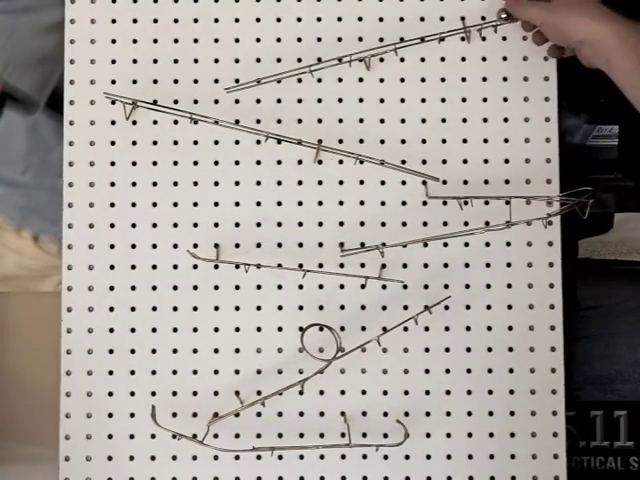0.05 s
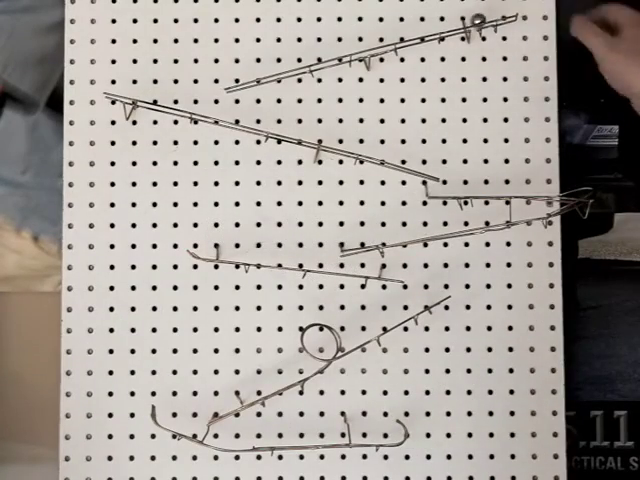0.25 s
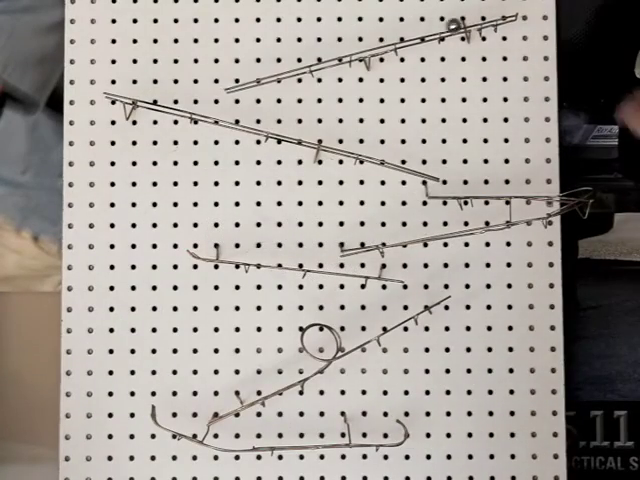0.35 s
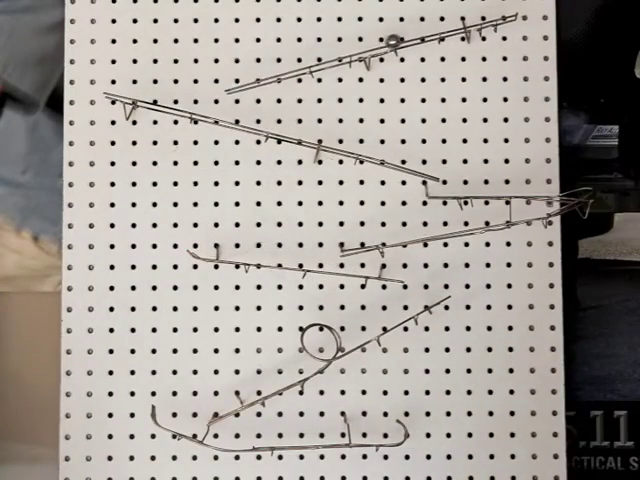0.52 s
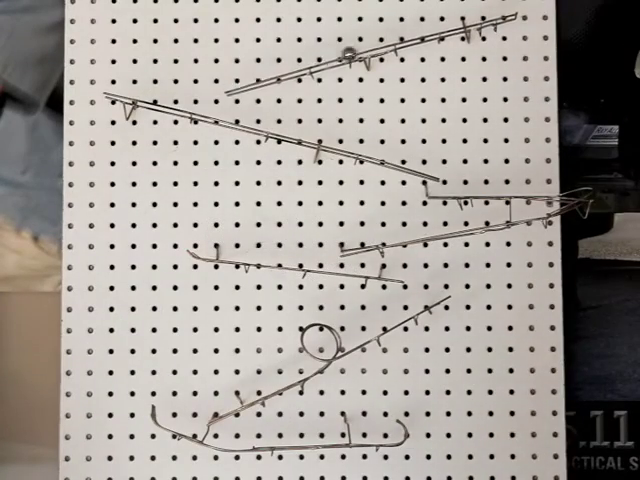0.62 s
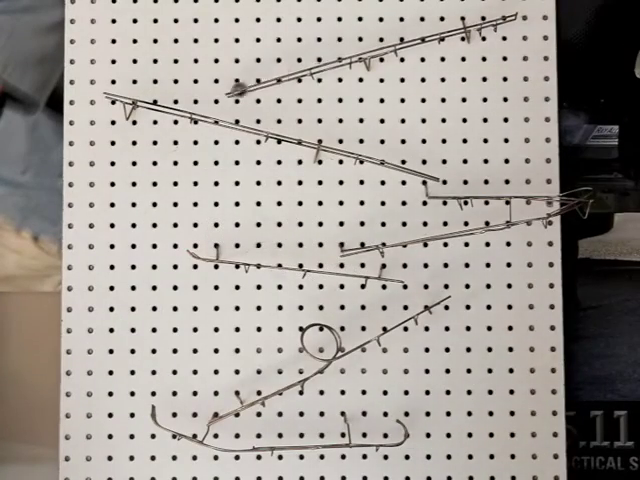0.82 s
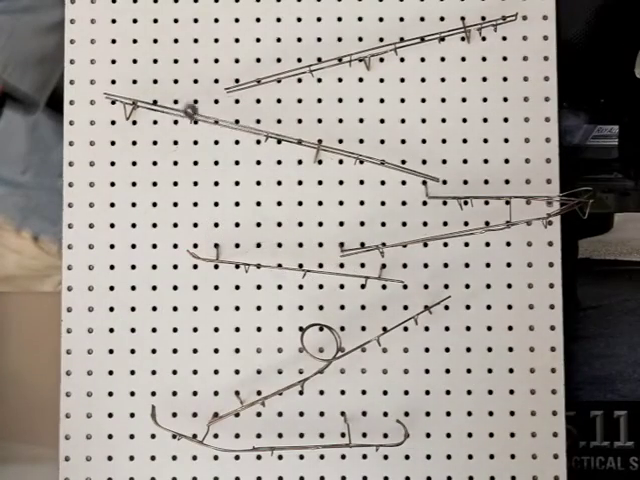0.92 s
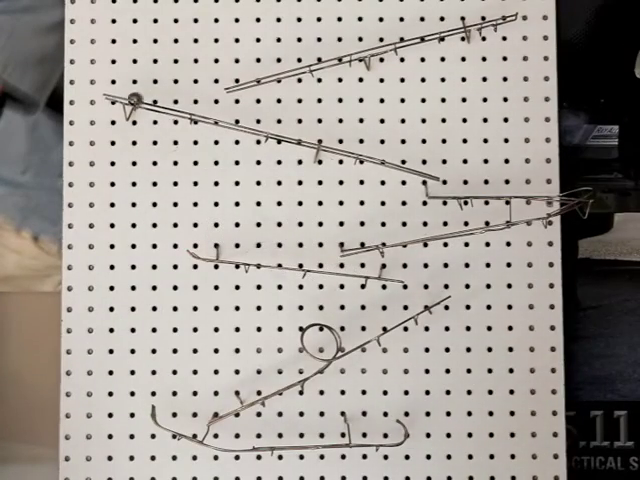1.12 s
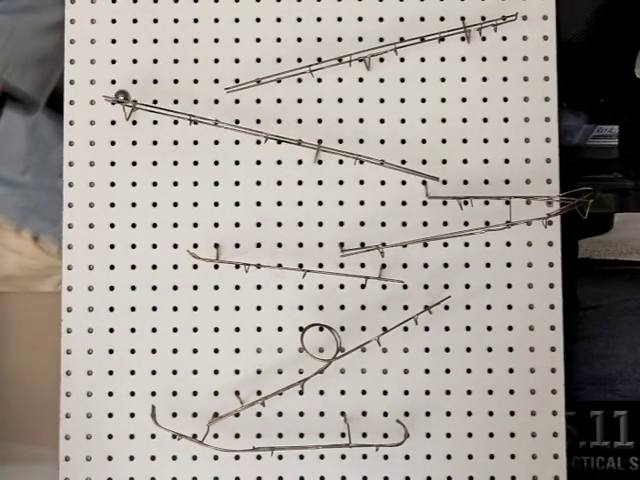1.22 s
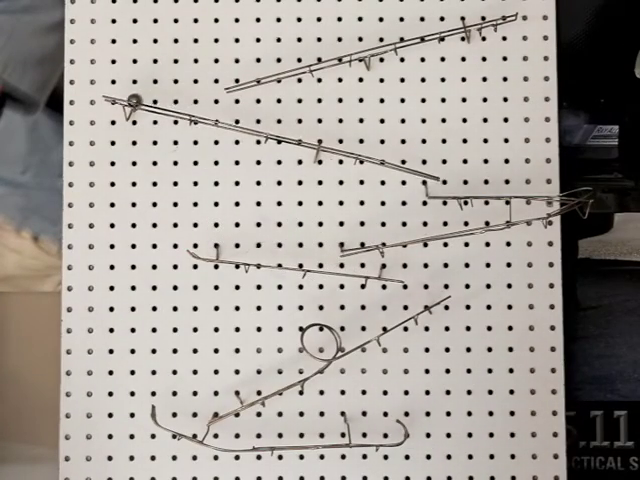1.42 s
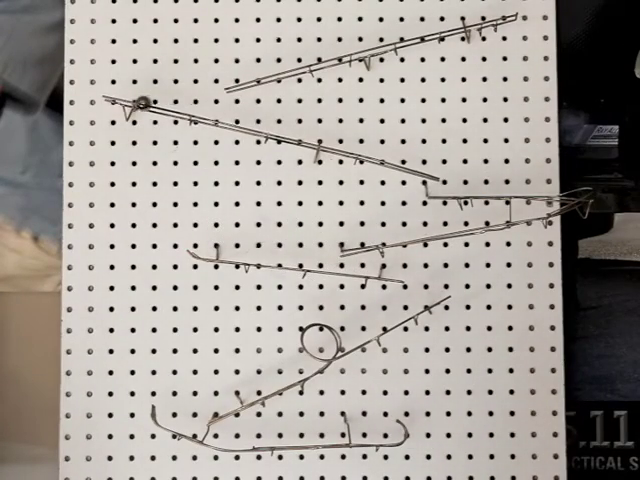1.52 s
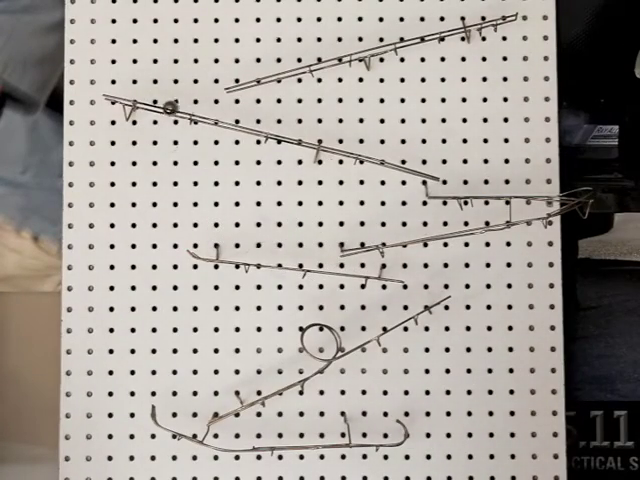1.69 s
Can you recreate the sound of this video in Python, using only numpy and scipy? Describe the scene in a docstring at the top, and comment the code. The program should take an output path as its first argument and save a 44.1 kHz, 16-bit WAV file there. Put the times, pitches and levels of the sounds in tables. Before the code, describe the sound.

A small steel ball rolls down thin wire rails with ringing ticks and a low rumble from the board behind. It drops onto a second track with a clack, rattles and taps faintly, in a small room.

```python
"""In a small room, a small steel ball rolls down a pair of thin wire rails pegged to a board.
It ticks and knocks, drops onto a second track with a clack, rattles against the raised end
and creeps back with a few faint taps. Contacts ring each track's own modes, the ball shakes
the board through the pegs, and the room blurs every contact."""
import sys
import numpy as np
from scipy import signal
from scipy.fft import rfft, irfft
from scipy.io import wavfile
from scipy.ndimage import uniform_filter1d

SR = 44100
rng = np.random.default_rng(int(sys.argv[2]) if len(sys.argv) > 2 else 0)


def file_out(sig):
    """Save sig as 16-bit WAV at sys.argv[1]."""
    # one column per channel
    cols = np.atleast_2d(sig).T
    # limit, then scale
    lim = np.clip(cols, -1, 1)
    pcm = np.round(lim * 32767).astype(np.int16)
    wavfile.write(sys.argv[1], SR, pcm)


N = 77175
T = np.arange(N) / SR
BIN_HZ = np.fft.rfftfreq(N, 1 / SR)
HEAD_END_S, LANDING_S, RAISED_END_S, WAY_BACK_S = 0.375, 0.975, 1.1, 1.35

# Spectra of room tone and of an earlier touch. Each row: frequency in Hz, relative density in dB.
ROOM_COLOUR = [(50, -16), (70, -2), (88, 2), (107, 9), (150, -3), (330, 1.5), (700, -7), (1600, -8.5),
               (7000, -20), (16000, -38)]
FADING_COLOUR = [(100, -28), (340, 5), (700, 3.5), (1500, -2), (4500, 2.5), (8000, -3.5), (12000, -25)]
# Wire tones of that touch. Each row: frequency in Hz, level in dB, T60 in seconds.
FADING_MODES = [(339.6, -41, 0.32), (1510, -51.5, 1)]
# Board resonances. Each row: frequency in Hz, width in Hz, relative level in dB.
BOARD_MODES = [(274.4, 24, -1), (295, 36, 1.5), (336.8, 18.6, 0), (394, 41, -10), (458.5, 21, 2.5),
               (535, 88, -32)]
# Rolling force on board and on wires. Each row: time in seconds, relative level in dB.
RUMBLE_ENVELOPE = [(0.22, -68), (0.248, -37), (0.33, -36.5), (0.492, -40), (0.514, -27.5), (0.774, -30.5),
                   (0.786, -33.5), (0.952, -35.5), (0.97, -63), (1.016, -22), (1.096, -33), (1.17, -19),
                   (1.366, -66), (1.392, -43), (1.494, -48.5), (1.57, -66), (1.65, -45), (1.75, -57)]
TICK_ENVELOPE = [(.23, -31), (.32, -40.5), (.42, -31), (.48, -30), (.53, -25), (.66, -26), (.74, -26),
                 (.79, -34), (.87, -26.5), (.93, -30), (.975, -39), (1.02, -25), (1.09, -31), (1.18, -22),
                 (1.27, -34.5), (1.35, -39.5), (1.41, -35.5), (1.47, -78), (1.75, -38)]
# Knocks on the wires. Each row: start in seconds, level in dB, gain below 3 kHz in dB,
# gain above 10 kHz in dB.
KNOCKS = [(.232, -23, -2, 3), (0.281, -33.5, 7, -10), (0.301, -28.5, 9.5, 13.5), (0.31, -24.5, 7, -14),
          (0.351, -31, 8.5, 6), (.386, -18.5, -2, -3), (0.403, -26.5, 5.5, 17.5), (0.423, -24, 9.5, -16),
          (.503, -29.5, 15, 14.5), (.552, -23, 2, 7), (.627, -21.5, -4, 9), (0.637, -16.5, -3, 4),
          (.657, -12, -6.5, 3), (0.706, -24.5, 3, 7.5), (0.778, -24.5, -13, -5), (.803, -20.5, -1, 5.5),
          (.829, -19, -2.5, 3), (.846, -21, 0.5, 6), (0.866, -19.5, -10, 2), (.987, -11, -2.5, 3),
          (1.017, -29, 13.5, 18), (1.113, -24, 4, 4.5), (1.129, -23, -10, 8.5), (1.155, -20.5, -0.5, 7),
          (1.171, -22.5, -3.5, 10), (1.233, -26, -4.5, -6), (1.289, -21, -24, -26),
          (1.366, -23.5, -10, -21), (1.377, -30, 2, -21), (1.522, -43.5, 13.5, -3), (1.595, -36, 5, -11),
          (1.609, -47.5, 16, -9)]
# Tail of wires and room. Each row: frequency in Hz, T60 in seconds.
TAIL_DECAY = [(200, 0.61), (1400, 0.48), (4000, 0.33), (9000, 0.19), (15000, 0.13)]
# Clack spectra: upper head, upper run, lower track. Each row: frequency in Hz, relative density in dB.
HEAD_COLOUR = [(150, -7.5), (350, 10.5), (700, -11), (2600, -4), (3500, -13), (4500, 2.5), (5350, -9),
               (6400, 2.5), (9000, -6), (11500, -18), (15500, -34)]
RUN_COLOUR = [(150, -11), (320, 7.5), (650, -4.5), (1300, -5), (2000, 0), (3400, -3.5), (4700, 1),
              (5350, -3.5), (6200, 2), (7700, 1), (9300, -8), (11200, -22.5), (15500, -39)]
LOWER_COLOUR = [(150, -5.5), (350, 6.5), (700, -1), (1300, 3), (2200, 1.5), (3800, -4), (4700, 3.5),
                (5150, -4), (6800, 2.5), (7600, -4), (9200, -6.5), (11500, -17.5), (15500, -30)]
# Upper track modes. Each row: frequency in Hz, relative levels in dB struck at head and on run.
UPPER_MODES = [(747, -15.5, -12), (862, -13.5, -16.5), (1169, -10.5, -16.5), (1509.5, -2, -16),
               (1945, -19.5, -14), (2296, -15.5, -29), (2904, -18, -16.5), (4240, -13, -20),
               (4673, -6.5, -21), (4840, -7.5, -15.5), (5435, -15, -33), (6090, -9.5, -22),
               (6220, -17.5, -32), (6430, -10, -38), (6870, -25, -32), (7010, -9, -34), (7655, -28, -20.5),
               (8260, -26, -26)]
# Lower track modes. Each row: frequency in Hz, relative levels in dB struck at landing,
# at raised end and on way back, T60 in seconds.
LOWER_MODES = [(462.5, -39, -12.5, -11, 0.22), (962, -23, -18, -28, 0.58), (1098, -23.5, -12.5, -23, 0.61),
               (1162, -28, -25, -21, 0.32), (1298, -23, -33, -16.5, 0.66), (1486, -21, -17.5, -26, 1.45),
               (2160, -24, -18, -17, 0.25), (3480, -15, -20, -32, 0.19), (4800, -16.5, -12.5, -28, 0.1),
               (5355, -16, -9.5, -16, 0.18), (6140, -21, -26, -31, 0.45), (6720, -17.5, -18, -12, 0.25),
               (6910, -22.5, -14.5, -18, 0.11), (7650, -30, -17, -23, 0.18), (8000, -7, -20, -29, 0.32),
               (8655, -19, -31, -35, 0.32), (9027, -17, -23, -36, .13)]


def from_db(db):
    """Decibels to gain."""
    return 10 ** (np.asarray(db) / 20)


def unit_rms(x):
    """Scale to unit rms."""
    return x / np.sqrt(np.mean(x ** 2) + 1e-20)


def at_hz(rows, hz):
    """Interpolate on a log-frequency axis."""
    row_hz, values = np.transpose(rows)
    return np.interp(np.log(np.maximum(hz, 1)), np.log(row_hz), values)


def envelope(rows, time_s):
    """Gain over time, silent before the first row."""
    return from_db(np.interp(time_s, *np.transpose(rows), left=-np.inf))


def butter(x, hz, kind):
    """Causal Butterworth filter."""
    return signal.sosfilt(signal.butter(2, hz, kind, fs=SR, output="sos"), x + 1e-18)


def coloured_noise(colour):
    """Shaped noise, unit rms."""
    return unit_rms(irfft(rfft(rng.standard_normal(N)) * from_db(at_hz(colour, BIN_HZ)), N))


def decay(t60_s):
    """Exponential decay from time zero."""
    return np.exp(-np.log(1000) * T / t60_s)


def ring(modes):
    """Sum of damped sines."""
    return sum(from_db(db) * np.sin(2 * np.pi * hz * T) * decay(t60_s) for hz, db, t60_s in modes)


def drive(force, response):
    """Drive a body with a contact force."""
    return signal.fftconvolve(force, response)[:N]


def room_tone():
    """Steady, mostly low noise."""
    return from_db(-47) * coloured_noise(ROOM_COLOUR)


def fading_touch():
    """An earlier touch on the track dies away."""
    return from_db(-43) * coloured_noise(FADING_COLOUR) * decay(t60_s=0.34) + ring(FADING_MODES)


def ticks(per_s, spread_db):
    """Tiny random rolling contacts of uneven size, unit rms."""
    sizes = from_db(spread_db * np.minimum(rng.exponential(1, N), 4))
    signs = rng.choice([-1, 1], N)
    return unit_rms(sizes * signs * (rng.random(N) < per_s / SR))


def board_rumble(lead_s=0.0029):
    """The rolling ball shakes the board through the pegs."""
    response = sum(
        (-1) ** k * from_db(db) * np.sqrt(width_hz)
        * np.cos(2 * np.pi * hz * T) * np.exp(-np.pi * width_hz * T)
        for k, (hz, width_hz, db) in enumerate(BOARD_MODES))
    response = butter(response, [210, 650], "band")
    force = ticks(per_s=2200, spread_db=-2) * envelope(RUMBLE_ENVELOPE, T + lead_s)
    return from_db(-3.5) * drive(force, response / np.linalg.norm(response))


def contact_click(ripple_db=4.5, finest_ripple_hz=274):
    """Unit-energy click with random treble ripple: each spot struck favours other modes."""
    lag_s = np.arange(2048) / SR
    echoes = rng.standard_normal(len(lag_s)) * (lag_s > 0.0007)
    echoes *= np.exp(-(lag_s * finest_ripple_hz) ** 2)
    # Long waves hardly depend on the spot.
    ripple = rfft(butter(echoes / np.linalg.norm(echoes), 2000, "high"))
    click = irfft(from_db(ripple_db * np.sqrt(2) * ripple))
    return click / np.linalg.norm(click)


def knocks(low_hz=3000, high_hz=10000):
    """Force of sharp ball-on-wire contacts, each with its own three-band balance."""
    low, mid, high = np.zeros((3, N))
    for start_s, db, low_db, high_db in KNOCKS:
        click = from_db(db) * contact_click()
        start = int(start_s * SR)
        span = slice(start, start + len(click))
        low[span] += from_db(low_db) * click
        mid[span] += click
        high[span] += from_db(high_db) * click
    return (butter(low, low_hz, "low") - butter(mid, [low_hz, high_hz], "band")
            + butter(high, high_hz, "high"))


def clack_spectrum(swell, tail_db=-14.5, direct_db=-9.5):
    """Dense short-lived modes with a tail of wires and room, evened out over frequency."""
    noise = rfft(rng.standard_normal(N))
    edges_hz = [0, 700, 2000, 4000, 7000, 11000, SR]
    dense = 0
    for low_hz, high_hz in zip(edges_hz, edges_hz[1:]):
        band = irfft(noise * ((BIN_HZ >= low_hz) & (BIN_HZ < high_hz)), N)
        tail = from_db(tail_db) * decay(at_hz(TAIL_DECAY, (low_hz + high_hz) / 2))
        dense += band * (decay(t60_s=0.097) + tail)
    direct = from_db(direct_db) * decay(t60_s=0.0063)
    spectrum = rfft(dense * (swell + direct))
    power = np.abs(spectrum) ** 2
    return spectrum * np.sqrt(uniform_filter1d(power, size=4000) / uniform_filter1d(power, size=260))


def track_response(colour, modes, ring_db, clack_db, swell_s=0.0054, cluster_db=18, cluster_width_hz=45):
    """One touch: clear modes ring and a dense clack swells through wires and room."""
    swell = 1 - np.exp(-T / swell_s)
    # Short-lived modes crowd around each clear one.
    clusters = sum(from_db(db + cluster_db) ** 2 / (1 + ((BIN_HZ - hz) / cluster_width_hz) ** 2) ** 2
                   for hz, db, _ in modes)
    shape = unit_rms(from_db(at_hz(colour, BIN_HZ))) * np.sqrt(1 + clusters)
    clack = irfft(clack_spectrum(swell) * shape, N) * (T < 1)
    return butter(from_db(clack_db) * clack + from_db(ring_db) * ring(modes) * swell, 154, "high")


def stretch(start_s, end_s, colour, modes, ring_db, clack_db):
    """Knocks and rolling ticks drive a stretch of track while the ball is on it."""
    response = track_response(colour, modes, ring_db, clack_db)
    rolling = ticks(per_s=900, spread_db=3) * envelope(TICK_ENVELOPE, T) / np.linalg.norm(response)
    on_stretch = (T >= start_s) & (T < end_s)
    return drive((knocks() + rolling) * on_stretch, response)


def modes_by_stretch(modes):
    """One mode list per level column."""
    hz, *levels_db, t60_s = np.transpose(modes)
    return [list(zip(hz, db, t60_s)) for db in levels_db]


def upper_track(ring_db=1.5, t60_s=0.14):
    """The ball pings at the head of the track, then rolls down its run."""
    head, run = modes_by_stretch([(*mode, t60_s) for mode in UPPER_MODES])
    return (stretch(0, HEAD_END_S, HEAD_COLOUR, head, ring_db, clack_db=0.5)
            + stretch(HEAD_END_S, LANDING_S, RUN_COLOUR, run, ring_db, clack_db=0.77))


def lower_track(ring_db=-0.5, settle_s=1.654, damping_db_per_s=130):
    """The ball lands, rattles at the raised end, creeps back, settles and damps the wires."""
    landing, raised_end, way_back = modes_by_stretch(LOWER_MODES)
    wires = (stretch(LANDING_S, RAISED_END_S, LOWER_COLOUR, landing, ring_db, clack_db=0.3)
             + stretch(RAISED_END_S, WAY_BACK_S, LOWER_COLOUR, raised_end, ring_db, clack_db=3)
             + stretch(WAY_BACK_S, np.inf, LOWER_COLOUR, way_back, ring_db, clack_db=-0.5))
    return wires * from_db(-damping_db_per_s * np.maximum(T - settle_s, 0))


def scene():
    """Both tracks over board and room, mono."""
    return (upper_track() + lower_track() + board_rumble() + room_tone() + fading_touch())[None]


def record(dry):
    """Steep low-pass at 15.9 kHz."""
    return signal.sosfilt(signal.ellip(10, 0.2, 80, 15900, fs=SR, output="sos"), dry)


dry = scene()
out = record(dry)
file_out(out)
```